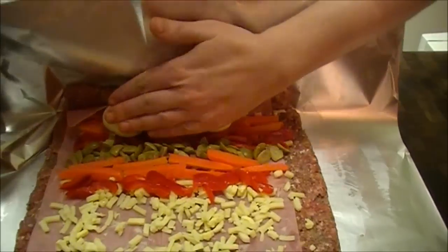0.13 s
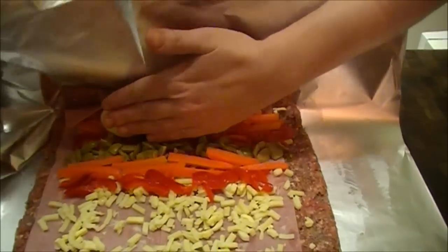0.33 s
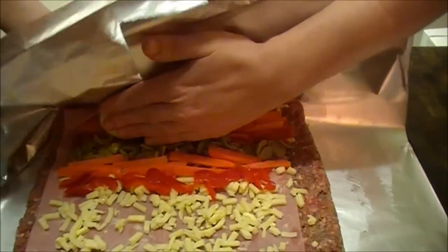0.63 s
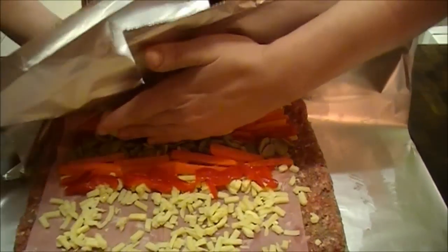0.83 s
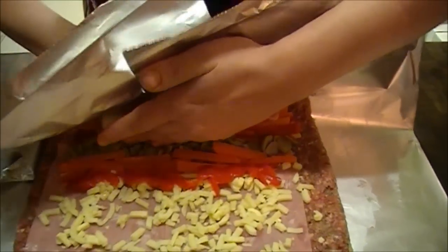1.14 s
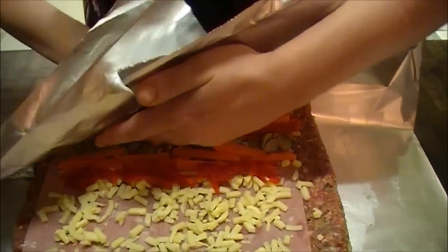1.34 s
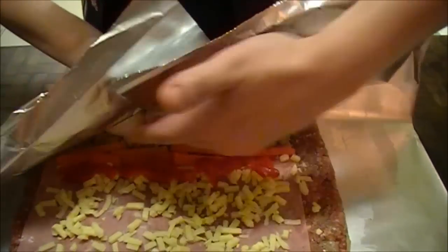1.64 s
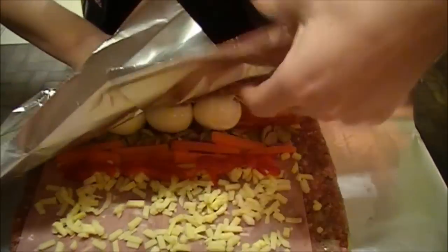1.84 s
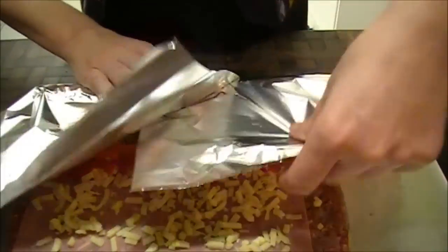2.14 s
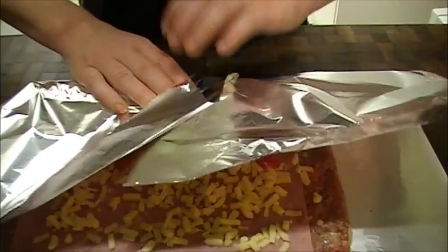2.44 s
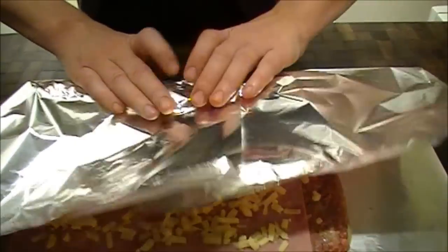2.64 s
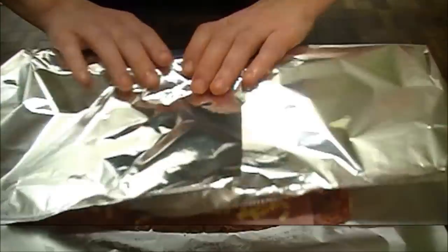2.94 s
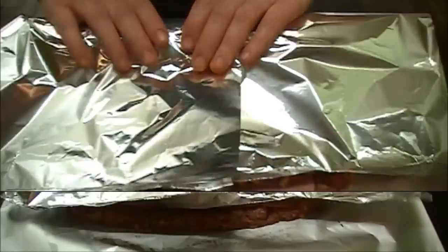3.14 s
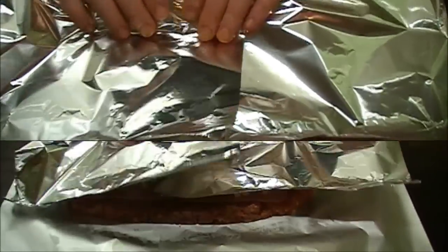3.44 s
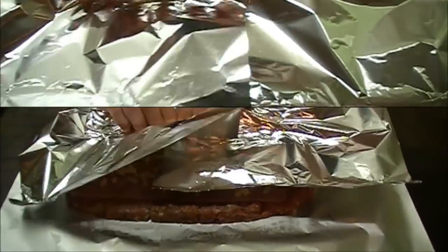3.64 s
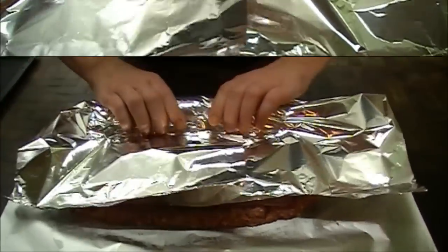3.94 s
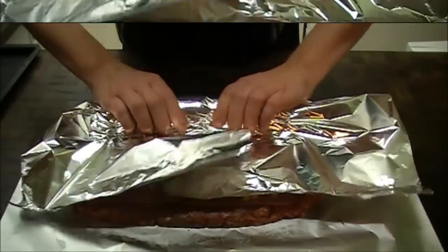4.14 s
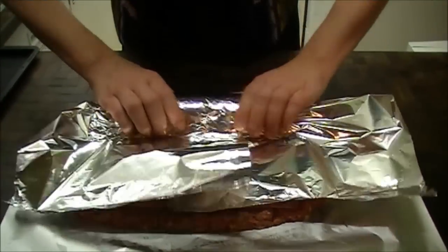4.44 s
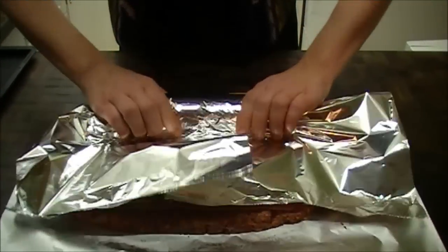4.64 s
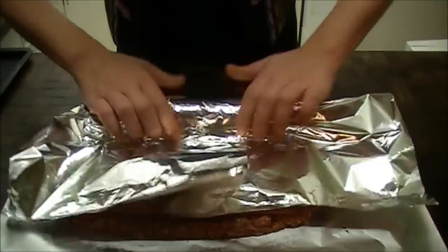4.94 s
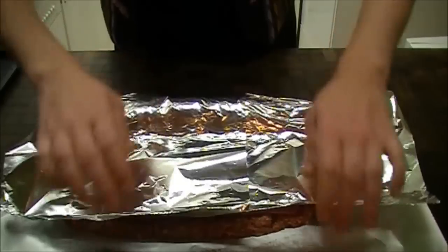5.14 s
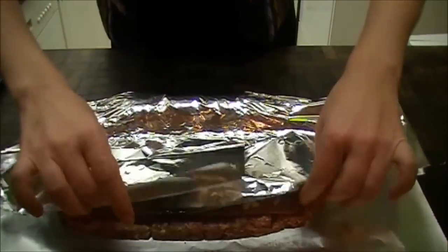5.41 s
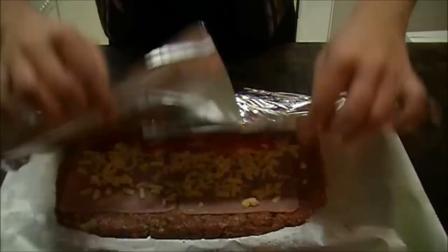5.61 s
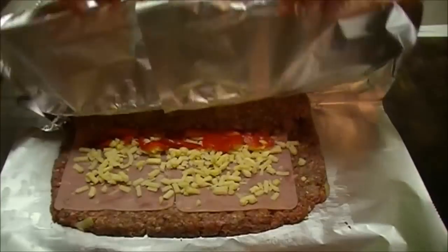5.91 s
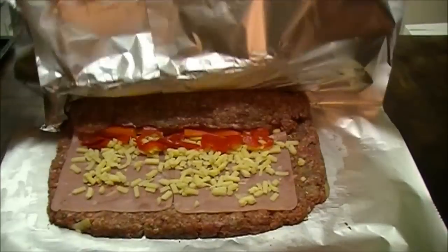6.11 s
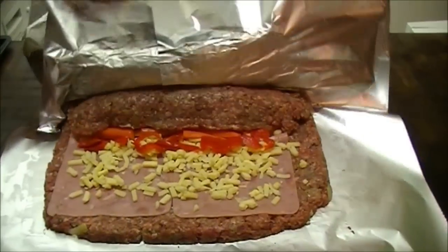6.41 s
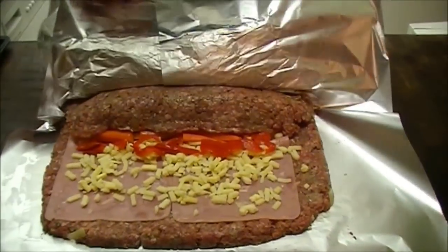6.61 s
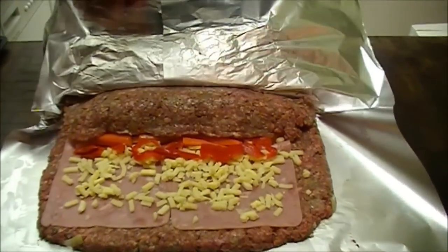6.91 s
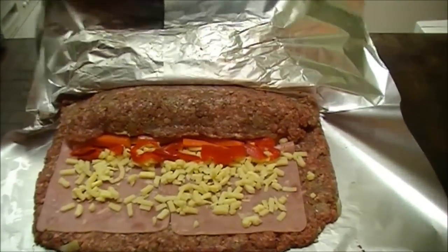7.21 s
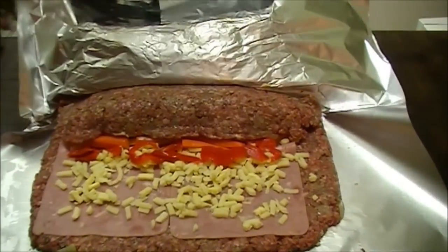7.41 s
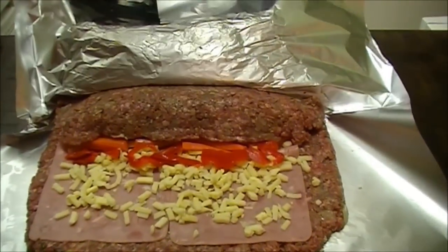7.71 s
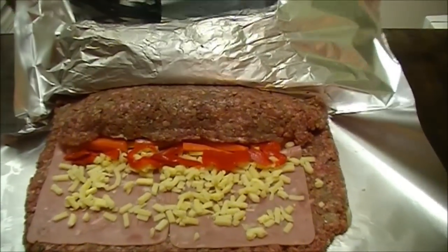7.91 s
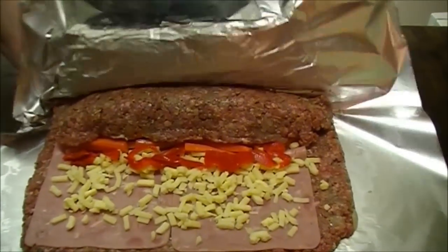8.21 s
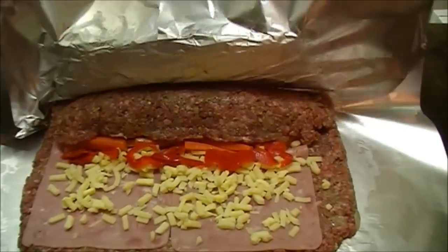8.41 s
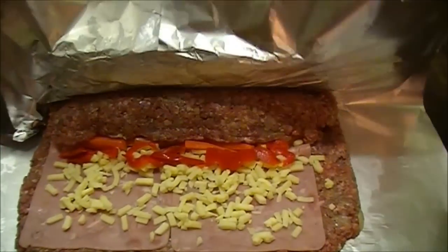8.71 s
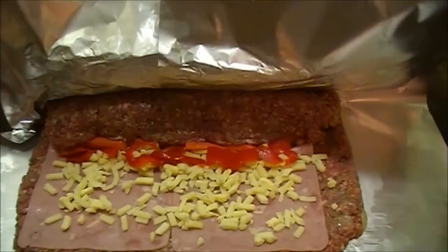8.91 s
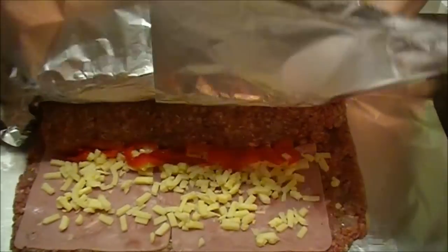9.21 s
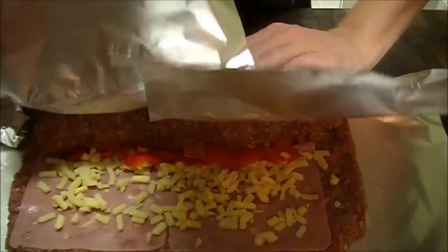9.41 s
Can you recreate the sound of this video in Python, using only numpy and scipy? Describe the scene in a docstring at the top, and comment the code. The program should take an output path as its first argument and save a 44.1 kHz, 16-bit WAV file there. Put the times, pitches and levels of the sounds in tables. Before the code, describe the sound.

Hands lift, fold and press kitchen foil near the microphone, making bright bursts of crackling, brief lulls and sudden snaps in a quiet room.

```python
"""A quiet room rumbles throughout, as noise shaped in frequency and wavering in level.
Over it, hands lift, fold and press a large sheet of kitchen foil close to a small stereo microphone.
From the start the sheet rustles, and bursts of crumpling soon rise out of it: each crease that buckles
is a click that sets a facet of the sheet ringing with dense, fast-dying modes, built from decaying noise.
Strong single snaps follow, and wide free parts of the sheet flex with a hollow low rattle and pops."""
import sys
import numpy as np
from scipy import signal
from scipy.fft import rfft, irfft
from scipy.io import wavfile

SR = 44100
rng = np.random.default_rng(int(sys.argv[2]) if len(sys.argv) > 2 else 0)


def wav_record(signal):
    """Record a signal, one row per channel, as 16-bit PCM in the file named by sys.argv[1]."""
    frames = np.transpose(np.atleast_2d(signal))
    bounded = np.clip(frames, -1, 1)
    # unit amplitude maps onto the largest positive 16-bit level
    quanta = np.round(bounded * 32767).astype(np.int16)
    wavfile.write(sys.argv[1], SR, quanta)


N = 421155


def amp(db):
    """Decibel law: 20 dB is a factor of ten in amplitude; amp(2 * db) is the power ratio."""
    return 10 ** (np.asarray(db) / 20)


def rms_one(x):
    """Normalization: scale to unit root mean square."""
    return x / np.sqrt(np.mean(x ** 2) + 1e-20)


def in_time(rows):
    """Linear interpolation: each column after the time gives one value per sample."""
    s, *columns = np.transpose(rows)
    return [np.interp(np.arange(N) / SR, s, column) for column in columns]


def at_hz(points, hz):
    """Logarithmic frequency scale: interpolate a table evenly per octave."""
    table_hz, values = np.transpose(points)
    return np.interp(np.log(hz), np.log(table_hz), values)


def stereo_bands(spectrum, size):
    """Mid-side stereo: third-octave noise bands as (centre, part in phase, part in antiphase)."""
    # Stereo width: (frequency [Hz], side level relative to mid [dB])
    stereo_width = [(60, -5), (110, -16), (200, -2.5), (380, -15), (700, -25), (1290, -22), (2380, -41.5),
                    (4400, -26), (8120, -8), (15000, -5.5)]
    settle = 2000   # samples for the filters to settle, then dropped
    hz = np.maximum(np.fft.rfftfreq(size + settle, 1 / SR), 1)
    # two independent noises, each with a mid and a side
    coloured = rfft(rng.standard_normal((2, 2, size + settle))) * amp(at_hz(spectrum, hz))
    coloured[:, 1] *= amp(at_hz(stereo_width, hz))
    noise = irfft(coloured, size + settle)
    edges = 25 * 2 ** (np.arange(29) / 3)
    for k, (low, high) in enumerate(zip(edges, edges[1:])):
        if spectrum[0][0] < high and low < spectrum[-1][0]:
            band = signal.butter(2, [low, high], "band", fs=SR, output="sos")
            # neighbouring bands draw on different noises
            mid, side = signal.sosfilt(band, noise[k % 2])[:, settle:]
            yield np.sqrt(low * high), mid, side * [[1], [-1]]


def rumble():
    """Broadband noise: random room sound, strong below 400 Hz with a narrow peak near 3 kHz."""
    # Room noise density: (frequency [Hz], relative level [dB per Hz])
    room_spectrum = [(15, -47), (25, 0.5), (306, 7), (345, 5.5), (405, -5.5), (655, -18), (816, 1.5),
                     (1890, -6), (2710, -14), (3000, 5), (3900, -35), (6600, -120)]
    # Wavering of the room noise: (time [s], level before the gain below [dB])
    room_levels = [(0.0, -59.5), (1.65, -60.5), (1.83, -56.5), (2.05, -69), (4.15, -60.5), (5.48, -63),
                   (5.77, -65), (6.65, -61.5), (8.85, -56.5), (9.55, -57.5)]
    gain_db = 7.0
    level_db, = in_time(room_levels)
    noise = sum(mid + side for hz, mid, side in stereo_bands(room_spectrum, size=N))
    return amp(level_db + gain_db) * rms_one(noise)


def handling():
    """Addition of powers: bursts rise fast, hold and fall more slowly, on top of the rustle."""
    # Rustle between bursts and size of the moving parts; folds and panels at the usual crackle level:
    # (time [s], crackle level [dB], folds level [dB], wide panels level [dB])
    rustle = [(0.0, -34, -38, -45.5), (0.42, -49, -38.5, -45), (0.6, -25, -40, -44.5),
              (1.0, -31, -40.5, -44.5), (1.88, -53, -39, -44), (2.05, -23.5, -41, -46.5),
              (2.5, -32, -37, -48), (3.3, -24.5, -39, -49), (3.9, -26, -39, -50.5), (4.5, -28, -41.5, -49),
              (5.0, -33, -43, -52), (5.28, -61, -45.5, -55), (5.45, -24, -41.5, -55.5),
              (5.8, -25.5, -40, -45.5), (6.9, -30.5, -41, -45.5), (7.3, -20.5, -40, -48),
              (7.5, -38, -41, -46.5), (7.8, -46.5, -43.5, -52), (8.15, -20, -38, -44), (8.7, -35, -40, -45),
              (9.05, -39, -40.5, -47), (9.3, -28, -37.5, -44.5), (9.55, -39, -45, -49)]
    # The hands hesitate, the rustle sinks, then picks up at once: (end [s], length [s], depth [dB])
    lulls = [(0.08, .04, 5), (1.005, .04, 11), (1.076, .04, 12), (1.144, .03, 7), (2.296, 0.068, 5),
             (2.39, 0.062, 6.5), (2.864, 0.054, 12.5), (4.065, .04, 8), (4.526, 0.069, 10), (4.699, .05, 2),
             (8.51, .02, 11), (8.97, 0.047, 10)]
    # Crumpling as the sheet gives way under the hands: (start of hold [s], hold [s], crackle level [dB])
    bursts = [(0.096, 0.048, -26.5), (0.186, 0.059, -30.5), (0.279, 0.069, -27.5), (0.451, 0.1, -21.5),
              (0.677, 0.007, -19), (0.91, 0.028, -26), (1.01, 0.013, -29.5), (1.092, 0.023, -34),
              (1.148, 0.056, -30.5), (1.226, 0.035, -23.5), (1.311, 0.026, -21.5), (1.377, 0.023, -24),
              (1.474, 0.005, -32.5), (1.528, 0.003, -39), (1.58, 0.042, -23), (1.69, 0.0073, -21),
              (1.785, 0.0068, -27.5), (1.906, 0.04, -17), (1.995, 0.013, -21), (2.188, 0.021, -26),
              (2.298, 0.02, -27.5), (2.401, 0.021, -25.5), (2.542, 0.17, -23.5), (2.731, 0.074, -23),
              (2.87, 0.009, -26), (3.025, 0.048, -26), (3.129, 0.032, -19), (3.28, 0.1, -26.5),
              (3.463, 0.011, -24), (3.861, 0.069, -24.5), (4.144, 0.027, -22.5), (4.43, 0.03, -31),
              (4.542, 0.066, -23.5), (4.714, 0.031, -22), (4.909, 0.067, -24), (5.112, 0.0043, -43),
              (5.242, 0.004, -40.5), (5.324, 0.036, -22), (5.387, 0.013, -18), (5.626, 0.074, -21.5),
              (5.755, 0.045, -26), (5.83, 0.051, -24), (5.96, 0.044, -28), (6.339, 0.011, -35),
              (6.469, 0.048, -26.5), (6.566, 0.077, -28), (6.802, 0.05, -25), (7.031, 0.017, -22.5),
              (7.688, 0.017, -40), (7.791, 0.0027, -36), (7.85, 0.12, -29), (8.087, 0.037, -23),
              (8.385, 0.0075, -29), (8.465, 0.0091, -23), (8.546, 0.02, -28.5), (8.728, 0.023, -25),
              (8.819, 0.023, -33.5), (8.924, 0.004, -41), (8.983, 0.011, -26), (9.109, 0.0039, -27),
              (9.216, 0.029, -23.5), (9.369, 0.014, -26.5), (9.44, 0.048, -30.5)]
    rise_db_per_s, fall_db_per_s = 950, 340.5
    usual_db = -28
    folds_follow, panels_follow = 0.62, 0.47   # share of the crackle's swing in dB

    t = np.arange(N) / SR
    rustle_db, folds_db, panels_db = in_time(rustle)
    for end, length, depth_db in lulls:
        sinking = np.clip((t - end + length) / (.5 * length), 0, 1)
        rustle_db = rustle_db - depth_db * sinking * (t < end)
    power = amp(2 * rustle_db)
    for s, hold, db in bursts:
        near = slice(max(0, int((s - .1) * SR)), int((s + hold + .25) * SR))
        before, after = np.maximum(0, s - t[near]), np.maximum(0, t[near] - s - hold)
        power[near] += amp(2 * (db - rise_db_per_s * before - fall_db_per_s * after))
    crackle_db = 10 * np.log10(power)
    swing_db = crackle_db - usual_db
    return crackle_db, folds_db + folds_follow * swing_db, panels_db + panels_follow * swing_db


def drift(rate_hz):
    """Low-pass noise: two equal poles turn white noise into slow chance of unit rms."""
    step, settle = 40, 2000   # samples per slow value; slow values dropped
    pole = np.exp(-2 * np.pi * rate_hz * step / SR)
    white = rng.standard_normal(N // step + settle + 2)
    slow = signal.lfilter([1], [1, -2 * pole, pole * pole], white)[settle:]
    return np.interp(np.arange(N) / step, np.arange(len(slow)), rms_one(slow))


def crackle(level_db, per_s, busier, spread_db, clump_db):
    """Random impulse process: clumped clicks, many faint and few strong, faster when handled harder."""
    pace = amp(busier * (level_db + 25))   # per_s holds at -25 dB
    born = rng.random(N) < per_s * pace / SR
    sizes = amp(spread_db * np.minimum(rng.exponential(1, N), 5)) * rng.choice([-1, 1], N)
    clumps = amp(clump_db * drift(30.3))
    # dividing by the root of the pace keeps the power independent of the click rate
    return amp(level_db) * rms_one(born * sizes * clumps / np.sqrt(pace))


def facet(spectrum, colour_db):
    """Impulse response: a crack, modes too dense to part (dying noise), then the room."""
    # Ring of a facet: (frequency [Hz], time to fall 60 dB [s])
    ring_t60 = [(200, 0.14), (800, 0.046), (3000, 0.15), (8000, 0.081), (15000, 0.098)]
    # Tail of the kitchen: (frequency [Hz], time to fall 60 dB [s])
    room_t60 = [(200, 0.11), (2000, 0.77), (8000, 0.04), (15000, 0.046)]
    crack_t60_s, room_db = .013, -13   # room level at its onset, relative to the ring
    t, out = np.arange(SR // 4) / SR, 0
    crack_db = 7 + 2.3 * rng.standard_normal()   # over the ring: some facets tick drily, others ring on
    for hz, mid, side in stereo_bands(spectrum, size=len(t)):
        crack = amp(crack_db - 60 * t / crack_t60_s)
        ring = amp(-60 * t / np.clip(at_hz(ring_t60, hz), .005, 1))
        room = amp(room_db - 60 * t / np.clip(at_hz(room_t60, hz), .02, 1))
        build_up = np.minimum(1, t * hz * 0.71)   # low modes need about a cycle to build up
        dying = (crack + ring + room) * build_up
        band_gain = amp(colour_db * rng.standard_normal())   # each facet has its own colour
        out = out + band_gain * (mid + side) * dying / np.linalg.norm(dying)
    return out / np.sqrt(np.sum(out ** 2) / 2)


def rung(clicks, strong, spectrum, colour_db, count):
    """Convolution: clicks dealt out to facets excite their responses; strong ones are scaled by peak."""
    dealt, out = rng.integers(0, count, N), 0
    for k in range(count):
        ring = facet(spectrum, colour_db)
        ring_peak = np.abs(ring.mean(axis=0)).max()
        drive = (clicks + strong / ring_peak) * (dealt == k)
        out = out + signal.oaconvolve(drive[None], ring, axes=1)[:, :N]
    return out


def blows(s, peak_db):
    """Impulsive excitation: each strong buckle is a click one sample long."""
    clicks = np.zeros(N)
    clicks[np.round(s * SR).astype(int)] = amp(peak_db)
    return clicks


def foil():
    """Common excitation: the same buckles drive small facets, folds and panels at separate strengths."""
    # Creases that snap out of the crackle: (time [s], peak [dB], folds relative to that peak [dB])
    snaps = [(0.2992, -13, -12), (0.4544, -11, -11), (0.6764, -7, -15), (0.9078, -8.5, -14),
             (1.0081, -15, -8), (1.0779, -10, -18), (1.1074, -9.5, -16), (1.1897, -8, -20),
             (1.2236, -8.5, -11), (1.3214, -12, -19), (1.4082, -7.5, -18), (1.4775, -14, -22),
             (1.5229, -19.5, -22), (1.5883, -11.5, -21), (1.6856, -13.5, -11), (1.8959, -7.5, -14.5),
             (2.399, -13, -9), (2.5618, -8, -16), (2.6903, -14.5, -9.5), (2.8664, -10.5, -14),
             (3.1218, -12, -7), (3.3179, -8, -14), (3.3987, -4.5, -23), (3.5473, -12, -16),
             (3.7045, -9, -18), (4.0696, -12, -16), (4.1624, -8, -14), (4.2757, -19, -8),
             (4.3191, -13.5, -12), (4.3435, -8, -15), (4.5426, -6.5, -25), (4.615, -12, -18),
             (4.7147, -6.5, -18), (4.9272, -14, -20), (4.9566, -5.5, -16.5), (5.1043, -21.5, -23),
             (5.3073, -13, -20), (5.3462, -7, -14), (5.7853, -10.5, -23), (6.2635, -15, -21),
             (6.6807, -13, -17), (6.996, -14.5, -18), (7.0309, -10.5, -16), (7.8391, -16, -24),
             (8.2342, -11, -14), (8.2726, -6.5, -14), (8.316, -10, -14), (8.4013, -8, -16),
             (8.5185, -10, -16.5), (8.5713, -12, -17), (8.8094, -15, -22), (8.8817, -16, -11),
             (8.9106, -23, -14), (8.9266, -11.5, -22), (8.979, -18, -14), (9.0778, -17, -16),
             (9.0922, -11, -24), (9.1985, -10.5, -14.5), (9.2214, -13, -14), (9.2737, -5, -18.5),
             (9.3751, -12, -16), (9.3975, -5, -15), (9.4325, -13, -5), (9.4759, -9.5, -14)]
    # Wide panels popping through: (time [s], peak [dB])
    pops = [(0.337, -24.5), (0.457, -27), (0.677, -28), (0.907, -25.5), (0.958, -30), (1.014, -33),
            (1.905, -28.5), (2.013, -25.5), (2.476, -32), (2.554, -31), (3.106, -26.5), (3.195, -27.5),
            (3.4, -33.5), (3.774, -27), (4.2, -27.5), (6.033, -28), (6.578, -27), (6.646, -23),
            (6.814, -27.5), (8.055, -28), (8.123, -24), (8.394, -29), (8.517, -26), (9.243, -27)]
    # Small facets as the microphone hears them: (frequency [Hz], relative level [dB per Hz])
    facet_spectrum = [(1470, -24.5), (2500, -19.5), (4170, -9.5), (8140, 0), (13400, -20.5), (15200, -21.5),
                      (16000, -34)]
    # Hand-sized folds: (frequency [Hz], relative level [dB per Hz])
    fold_spectrum = [(550, -16.5), (900, -1), (1400, -1), (2300, 0), (3500, -3.5), (5000, -38)]
    # Wide panels: (frequency [Hz], relative level [dB per Hz])
    panel_spectrum = [(71, -38), (120, -14), (311, -10), (350, -7.5), (412, -0.5), (604, 7.5), (1050, -6),
                      (1360, -32), (2310, -120)]

    crackle_db, folds_db, panels_db = handling()
    bright = crackle(crackle_db, per_s=1500, busier=.5, spread_db=3.5, clump_db=2.0)
    middle = bright * amp(folds_db - crackle_db + 1.7 * rng.standard_normal(N))
    hollow = bright * amp(panels_db - crackle_db + 3.75 * rng.standard_normal(N))
    s, snap_db, fold_db = np.transpose(snaps)
    pop_s, pop_db = np.transpose(pops)
    small_facets = rung(bright, blows(s, snap_db), facet_spectrum, colour_db=2.0, count=18)
    folds = rung(middle, blows(s, snap_db + fold_db), fold_spectrum, colour_db=5.5, count=10)
    panels = rung(hollow, blows(pop_s, pop_db), panel_spectrum, colour_db=4.0, count=10)
    return small_facets + folds + panels


def scene():
    """Superposition: the pressures of foil and room noise add."""
    return foil() + rumble()


def record(dry):
    """Low-pass filtering: a steep Chebyshev filter holds the top 75 dB down from 15.9 kHz."""
    return signal.sosfilt(signal.cheby2(16, 75, 15900, fs=SR, output="sos"), dry)


dry = scene()
out = record(dry)
wav_record(out)
```